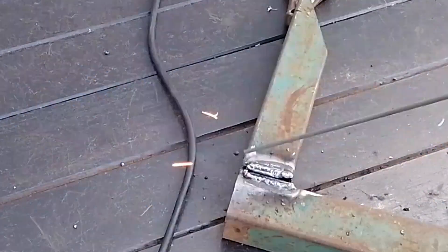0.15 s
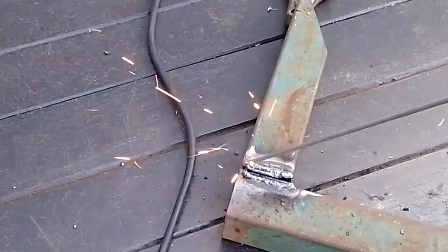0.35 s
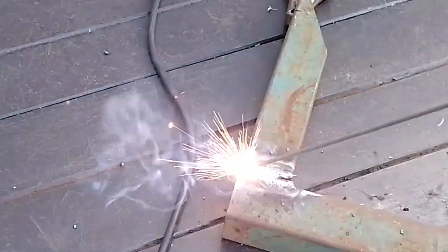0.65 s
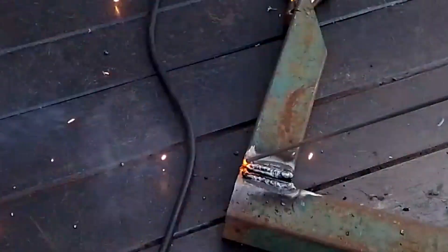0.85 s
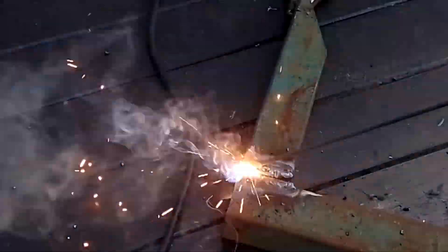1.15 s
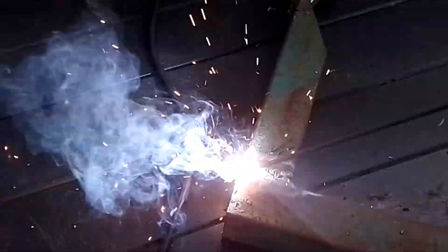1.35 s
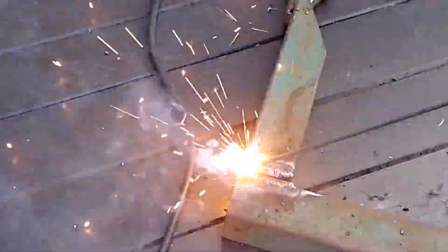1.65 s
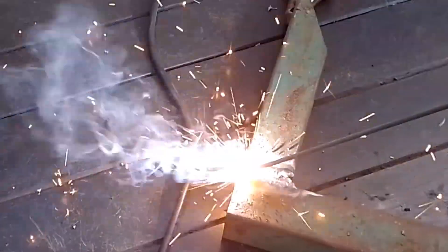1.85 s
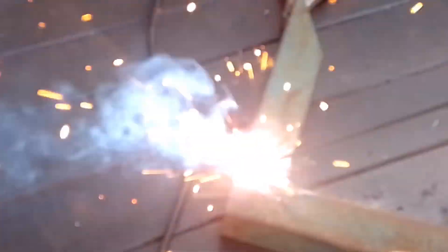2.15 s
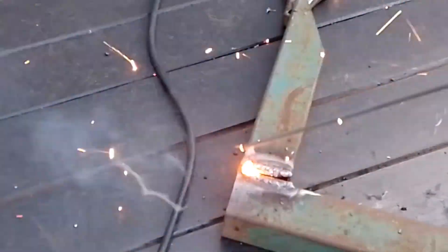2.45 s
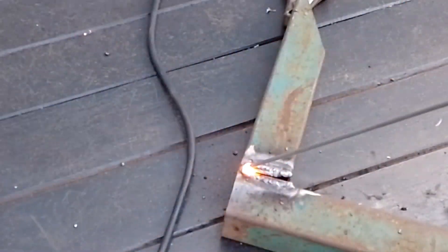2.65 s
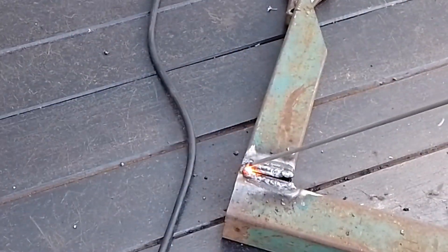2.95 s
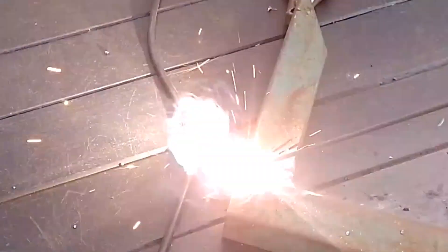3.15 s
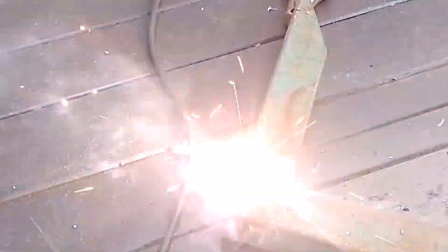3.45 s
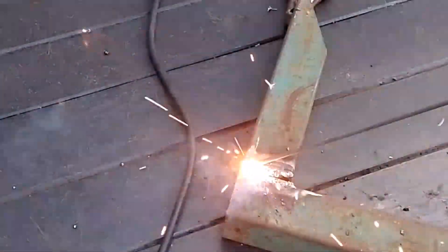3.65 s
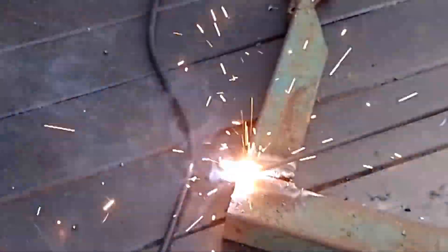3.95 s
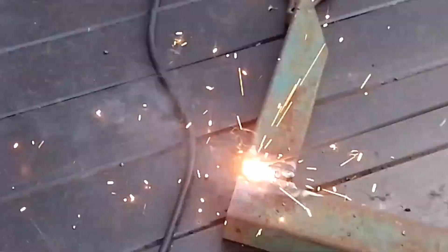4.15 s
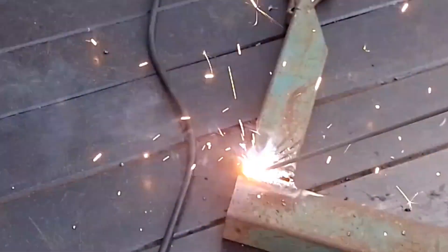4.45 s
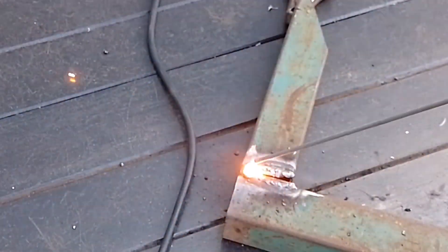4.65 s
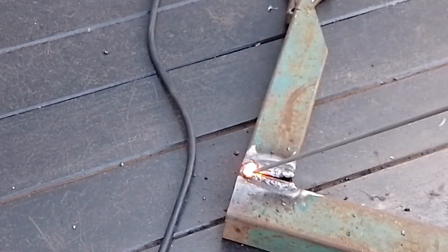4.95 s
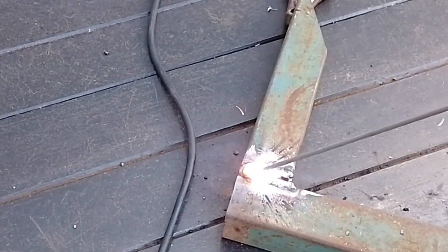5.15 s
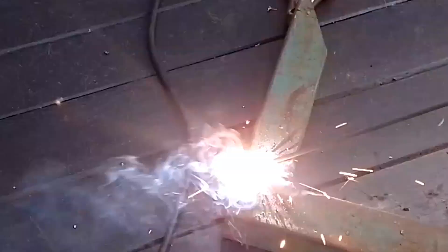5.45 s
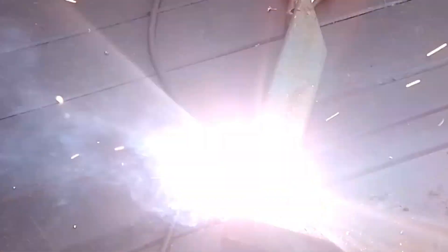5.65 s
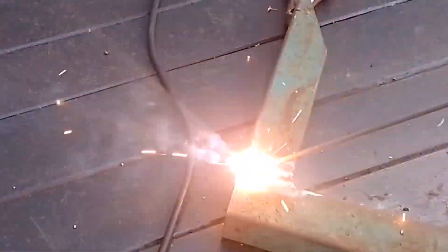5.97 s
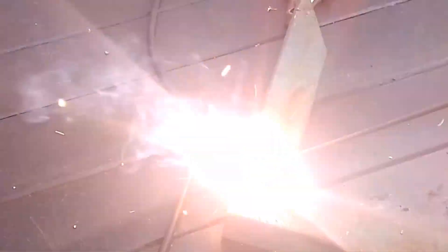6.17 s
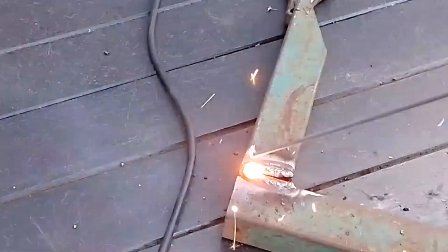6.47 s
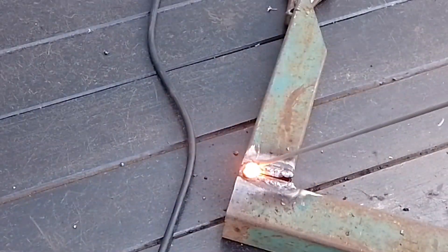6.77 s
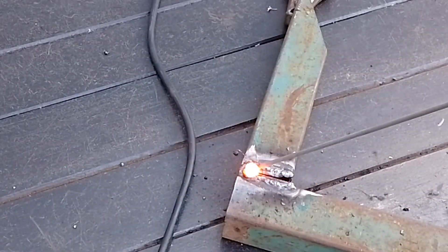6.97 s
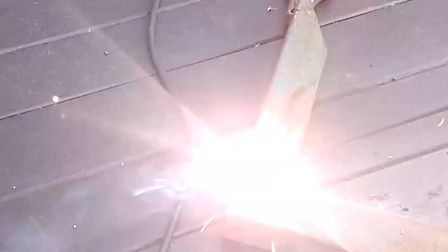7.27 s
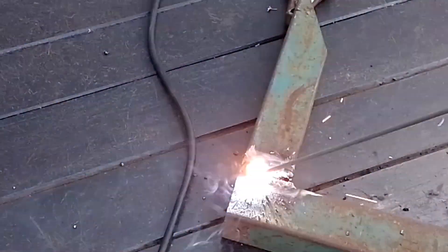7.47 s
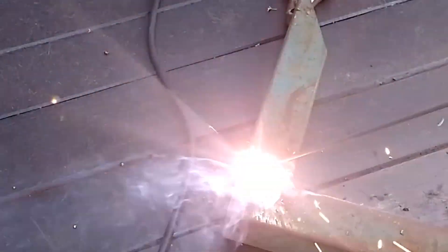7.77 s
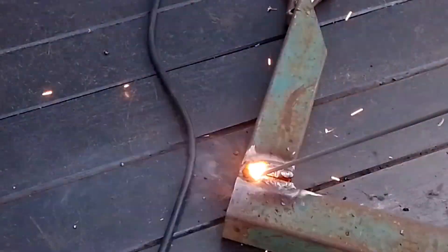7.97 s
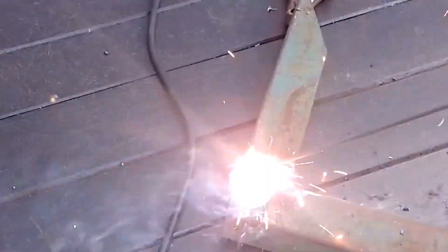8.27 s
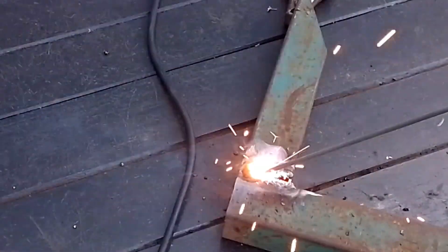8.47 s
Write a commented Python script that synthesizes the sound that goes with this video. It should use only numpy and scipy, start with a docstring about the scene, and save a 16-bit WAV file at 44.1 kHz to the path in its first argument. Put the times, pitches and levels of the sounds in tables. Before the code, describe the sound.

An arc welder sizzles and crackles on a thin steel tube in four short bursts, with sharp pops and soft ticks between.

```python
"""A faint fan hums, then a welding rod scratches a thin steel tube and its arc burns four times.
The arc sizzles and crackles, drops of metal short it with sharp pops, and hot gas gives a low,
fluttering roar. The tube rings, and the steel and a wooden deck below throw each snap back.
Between burns, spatter and cooling slag (the crust on the weld) tick softly."""
import sys
import numpy as np
from scipy import signal
from scipy.fft import rfft, irfft, next_fast_len
from scipy.io import wavfile
from scipy.ndimage import uniform_filter1d, map_coordinates

SR = 44100
rng = np.random.default_rng(int(sys.argv[2]) if len(sys.argv) > 2 else 0)


def generate_wav(sig):
    """Save sig (samples, or channels by samples) to the path in sys.argv[1] as 16-bit PCM at SR."""
    pcm = np.round(np.clip(np.atleast_2d(sig).T, -1, 1) * 32767).astype(np.int16)
    wavfile.write(sys.argv[1], SR, pcm)


N = 379701
TIME = np.arange(N) / SR


def amp(db):
    """Turn decibels into a gain."""
    return 10 ** (np.asarray(db) / 20)


def unit(x):
    """Scale x to an average power of 1."""
    return x / np.sqrt(np.mean(x ** 2) + 1e-20)


def along(points, hz):
    """Read between (frequency, value) points on a log frequency axis."""
    freqs, values = np.transpose(points)
    return np.interp(np.log(hz + 1), np.log(freqs + 1), values)


def curves(rows):
    """Turn each column after the time into one value per sample."""
    times, *columns = np.transpose(rows)
    return [np.interp(TIME, times, column) for column in columns]


def spans(rows, edge_s):
    """Add up flat bumps with sloping edges, one per (start, length, height) row."""
    return sum(np.interp(TIME, [s - edge_s, s, s + length, s + length + edge_s], [0, height, height, 0])
               for s, length, height in rows)


def wobble(rate):
    """A smooth curve through `rate` random values a second."""
    return map_coordinates(rng.standard_normal(int(N * rate / SR) + 4), [TIME * rate])


def filtered(x, response):
    """Scale and shift each frequency of x by response(hz)."""
    size = next_fast_len(len(x) + SR // 10)
    return irfft(rfft(x, size) * response(np.fft.rfftfreq(size, 1 / SR)), size)[:len(x)]


def resonances(modes, hz):
    """The response of something that rings at each (frequency, width, level) row."""
    return sum(amp(db) * 1j * hz * width / (f * f - hz * hz + 1j * hz * width) for f, width, db in modes)


def noise(spectrum):
    """Noise of power 1, shaped by (frequency, level) points."""
    return unit(filtered(rng.standard_normal(N), lambda hz: amp(along(spectrum, hz))))


# the hum of the welder's fan: (frequency [Hz], level [dB])
FAN_TONES = [(392, -75.5), (330, -86)]
# the steady rush of air: (frequency [Hz], relative level [dB])
AIR_SPECTRUM = [(15, -60.5), (25, -37.5), (193, -39), (227, -17), (331, -16.5), (368, -20.5), (399, -4.5),
                (445, -18.5), (782, -14), (919, -22.5), (1410, -23.5), (2420, -30), (7500, -40),
                (8810, -37), (15500, -46.5)]
def fan():
    """The fan hums two slightly unsteady tones over a rush of air."""
    hum = 0
    for hz, db in FAN_TONES:
        level = amp(db + 1.1 * wobble(7))
        phase = 2 * np.pi * np.cumsum(hz + 0.7 * wobble(4)) / SR
        hum += level * np.sqrt(2) * np.sin(phase)
    return hum + amp(-69) * noise(AIR_SPECTRUM)


# a faint distant rumble: (time [s], level [dB])
RUMBLE_LEVELS = [(0, -91), (3.5, -91), (5.3, -91.5), (6.3, -77.5), (7.8, -82.5), (8.6, -91)]
def rumble():
    """Low noise from far away swells slowly."""
    level = amp(curves(RUMBLE_LEVELS)[0])
    return level * noise([(20, -8), (55, -1), (120, -3.5), (170, -22), (600, -76.5)])


# the tone of one electric snap: (frequency [Hz], relative level [dB])
SNAP_SPECTRUM = [(120, -33.5), (700, -28), (1150, -16), (1800, -21.5), (2400, -18), (3400, -11),
                 (4100, -15), (5000, -15.5), (5700, -14), (7000, -5), (7800, -7.5), (9300, -0.5),
                 (10600, -5.5), (12100, -8.5), (13200, -14), (15300, -12.5)]
def snapped(x, body_db, split_hz=4700):
    """Turn each click into a snap. body_db sets how full it sounds: the part below split_hz."""
    size = 1024
    hz = np.fft.rfftfreq(size, 1 / SR)
    gain = amp(along(SNAP_SPECTRUM, hz))
    gain /= np.sqrt(np.mean(gain ** 2 * (hz > split_hz)))
    # minimum phase: a sudden start, then the ring
    fold = np.r_[1, np.full(size // 2 - 1, 2), 1, np.zeros(size // 2 - 1)]
    cepstrum = irfft(np.log(gain)) * fold
    snap = irfft(np.exp(rfft(cepstrum)))

    def band(sound, kind):
        sections = signal.butter(2, split_hz, kind, fs=SR, output="sos")
        return signal.sosfilt(np.tile(sections, (2, 1)), sound)

    clicks = band(x, "high") + band(x * amp(body_db), "low")
    thin = signal.lfilter(*signal.butter(1, 220, "high", fs=SR), clicks)
    return signal.fftconvolve(thin, snap)[:N]


def spits(rate, spread_db):
    """Scattered clicks of uneven size, about `rate` a second."""
    return (rng.random(N) < rate / SR) * amp(spread_db * rng.uniform(-1, 1, N))


def cooling_slag():
    """Slag crackles faintly, in patches, as it shrinks."""
    return snapped(amp(-65 + 4 * wobble(7)) * spits(rate=70, spread_db=8), body_db=-4.5)


def bursts(rows, spray_db, spray_s=0.0027, lead_s=0.0007):
    """Each drop sputters for an instant, goes off in one sharp click and scatters smaller ones."""
    lead = SR // 200
    t = np.arange(-lead, 2 * lead) / SR
    swell = np.exp(np.minimum(t / lead_s, -t / spray_s))
    clicks, body = np.zeros((2, N + len(t)))
    for s, db, body_db in rows:
        spray = swell * rng.standard_normal(len(t)) ** 3
        burst = amp(spray_db) * spray / np.linalg.norm(spray)
        burst[lead] = 1  # the main click
        start = round(s * SR) - lead
        clicks[start:start + len(t)] += amp(db) * burst
        body[start:start + len(t)] = body_db
    return snapped(clicks[:N], body[:N])


# spatter and slag between burns: (time [s], level [dB], body gain [dB])
SPATTER_TICKS = [(.1415, -27.5, 12), (1.93, -51, -9), (2.149, -46.5, 8), (4.068, -49.5, 0),
                 (4.093, -48.5, -1.5), (5.812, -36.5, -10), (5.905, -43.5, -3.5), (6.24, -48, -1.5),
                 (6.363, -56.5, -9), (8.104, -34, 5), (8.49, -45, -2), (8.573, -44.5, -4.5)]
def spatter():
    """Bits of spatter and slag tick while the arc is out."""
    return bursts(SPATTER_TICKS, spray_db=-13, spray_s=0.002, lead_s=0.0004)


# large drops that push the air: (time [s], level [dB])
AIR_PUSHES = [(0.143, -42.5), (0.4413, -23), (0.5908, -26.5), (0.762, -29), (3.368, -20), (4.9002, -26.5),
              (5.1397, -30), (5.6578, -28), (6.5481, -26.5), (6.7004, -34), (7.0355, -30), (7.172, -31),
              (7.5408, -33.5)]
def thumps(push_s=0.00031, knock_hz=430, knock_s=0.003):
    """A bursting drop gives one quick push of air and a short hollow knock from the tube."""
    t = np.arange(SR // 10) / SR
    push = (1 - t / push_s) * np.exp(-t / push_s)
    knock = amp(-27.5) * np.sin(2 * np.pi * knock_hz * t) * np.exp(-t / knock_s)
    thump = signal.lfilter(*signal.butter(4, 1500, fs=SR), push + knock)
    hits = np.zeros(N)
    for s, db in AIR_PUSHES:
        hits[round(s * SR)] = amp(db)
    return signal.fftconvolve(hits, thump)[:N]


def gate(start, end, fall_db_per_s, rise_db_per_s=4199):
    """A gain that snaps on at start, holds, and dies away from end."""
    db = np.minimum((TIME - start) * rise_db_per_s, (end - TIME) * fall_db_per_s)
    return amp(np.clip(db, -140, 0))


# a short scratch, then four burns: (start [s], end [s], body gain [dB], hiss afterwards [dB])
ARC_BURNS = [(0.145, 0.178, 13.5, -57.5), (0.304, 1.736, 4, -47.5), (2.368, 3.865, 2.5, -59),
             (4.447, 5.727, 3, -54), (6.381, 7.966, 3, -61)]
def burning(fall_db_per_s):
    """0 dB while the arc is lit, falling each time it goes out."""
    return 20 * np.log10(sum(gate(start, end, fall_db_per_s) for start, end, _, _ in ARC_BURNS))


# the arc's slow drift: (time [s], sizzle level [dB], gas roar level [dB])
ARC_DRIFT = [(0.155, -44, -47.5), (0.33, -34.5, -53.5), (0.44, -35.5, -41.5), (0.53, -38.5, -53.5),
             (0.62, -30, -43.5), (0.8, -30, -42), (0.98, -33.5, -53.5), (1.25, -31.0, -48),
             (1.45, -36, -46.5), (1.64, -37, -58), (1.73, -35, -44), (2.38, -38, -56), (2.48, -36, -56.5),
             (2.6, -33, -52.5), (2.78, -37.5, -62.5), (3.03, -35, -60), (3.25, -36, -56.5),
             (3.59, -34, -53), (3.68, -34.5, -62.5), (3.85, -34.5, -57), (4.46, -43.5, -76),
             (4.56, -34, -58), (4.72, -34, -54.5), (5.0, -34.5, -56), (5.28, -37.5, -59),
             (5.42, -36, -50.5), (5.6, -34, -50), (5.71, -37.0, -49), (6.4, -40.5, -61),
             (6.52, -36.5, -64.5), (6.82, -34.5, -57), (7.13, -36, -61), (7.3, -32.5, -58.5),
             (7.62, -33.5, -72.5), (7.74, -33, -70.0), (7.85, -39, -68), (7.95, -34.5, -62.5)]
# the arc flares and its crackle swells: (start [s], length [s], boost [dB])
ARC_FLARES = [(0.314, 0.047, 5.5), (0.44, 0.049, 4), (0.655, 0.023, 6.5), (0.76, 0.08, 5),
              (1.275, 0.022, 4), (1.52, 0.014, 2), (1.708, 0.033, 8), (2.57, 0.0072, 9), (2.613, 0.034, 6),
              (2.798, 0.052, 7), (3.005, 0.03, 4), (3.06, 0.095, 5.5), (3.26, 0.034, 5),
              (3.395, 0.024, 5.5), (3.735, 0.08, 2.5), (4.476, 0.023, 10.5), (4.692, 0.022, 2.5),
              (4.795, 0.048, 4), (5.128, 0.06, 7.5), (5.69, 0.03, 5), (6.495, 0.015, 9), (6.7, 0.014, 1.5),
              (7.03, 0.048, 7), (7.282, 0.022, 3.5), (7.425, 0.009, 1), (7.49, 0.015, -2),
              (7.705, 0.041, 5), (7.915, 0.015, 4.5)]
# the rod sticks and chokes the arc: (start [s], length [s], dip [dB])
ROD_STALLS = [(0.493, 0.016, 26), (2.402, 0.035, 40), (2.702, 0.023, 27), (2.757, 0.013, 20),
              (2.944, 0.0066, 10), (7.34, 0.012, 18), (7.868, 0.017, 4.5)]
def arc_levels():
    """Sizzle, body and roar in dB as the arc drifts, flares, stalls and sinks into its crater."""
    sizzle_drift, roar_drift = curves(ARC_DRIFT)
    flare_db = spans(ARC_FLARES, edge_s=0.006)
    stall_db = spans(ROD_STALLS, edge_s=0.0027)
    sizzle_db = 0.32 + sizzle_drift + burning(fall_db_per_s=657) + flare_db - stall_db
    roar_db = 0.2 + roar_drift + burning(fall_db_per_s=381) - 0.71 * stall_db
    body_db, = curves([(s, body) for start, end, body, _ in ARC_BURNS for s in (start, end)])
    body_db -= 0.52 * flare_db  # a flare lifts the body less than the treble
    body_db -= 18 * (curves(ROD_DEPTH)[0] - ROD_DEPTH[0][1])  # the sound thins as the rod sinks
    return sizzle_db, body_db, roar_db


def crackle(rate, spread_db, clump_db):
    """Tiny sparks of uneven size come in clumps, at a steady average power."""
    fires = rng.random(N) < rate / SR
    size_db = spread_db * np.clip(rng.standard_normal(N), -3, 2.2)
    sparks = fires * amp(size_db + clump_db * wobble(130))
    power = np.abs(uniform_filter1d(sparks ** 2, size=2200))
    return sparks / np.sqrt(power + 1e-9)


def hiss():
    """Gas hisses with a quick flicker."""
    return unit(rng.standard_normal(N) * amp(2.5 * wobble(160)))


def arc(sizzle_db, body_db):
    """A hot arc crackles and spits; as it dies only a hiss of gas is left."""
    heat = np.clip((sizzle_db + 56) / 10, 0, 1)
    spark_share = 0.73 * heat
    fizz = np.sqrt(1 - spark_share) * hiss()
    fizz += np.sqrt(spark_share) * crackle(rate=1500, spread_db=2, clump_db=3.5)
    fizz += amp(20.5) * heat * spits(rate=45, spread_db=4)
    # the body flickers at random under the treble
    return snapped(amp(sizzle_db) * fizz, body_db + 1.3 * wobble(200))


# the tone of the hot gas: (frequency [Hz], relative level [dB])
GAS_SPECTRUM = [(30, -41.5), (200, -34.5), (300, -11), (410, 0), (540, -5), (730, -17.5), (860, -8),
                (1100, -27), (3000, -74.5)]
def gas_roar(roar_db):
    """Gas from the rod's coating flutters as it expands; a strong jet also sounds deeper."""
    jet = np.clip((roar_db + 60.5) / 12, 0, 1)
    deep = noise([(190, -47), (240, -4), (310, -2), (420, -12), (900, -71)])
    gas = noise(GAS_SPECTRUM) + amp(-12) * jet * deep
    flutter = unit(amp(3.1 * wobble(70)))
    return amp(roar_db) * gas * flutter


def after_hiss(hold_s=0.075):
    """The hot rod goes on hissing thinly just after the arc goes out."""
    level = sum(amp(db) * gate(end, end + hold_s, fall_db_per_s=600) for _, end, _, db in ARC_BURNS)
    return snapped(level * hiss(), body_db=-15)


# large drops of melted metal: (time [s], relative level [dB], body gain [dB])
DROP_POPS = [(0.3006, -3.5, -9), (0.3214, 2.0, 0.5), (0.3935, -1.5, 2), (0.4386, 2.5, 5.5),
             (0.4556, 1.0, -5), (0.5098, 5.5, -3.5), (0.5307, -0.5, -7), (0.5801, 2, -3),
             (0.5913, -0.5, -4), (0.6766, -2, -2), (0.7272, -2, -20), (0.7633, 0, 2.5), (0.7898, -8, -11),
             (0.8332, -0.5, -9), (0.8774, -3, -15), (1.2838, -5, -17), (1.5288, -6.5, 6.5),
             (1.6797, -1.5, -3), (1.7117, -4, 2), (2.3674, -12.5, 4), (2.4324, 1.5, -7.5), (2.5701, -7, -3),
             (2.6924, -5, -8.5), (2.9161, -3, -6), (2.9672, -1.5, -21), (3.0252, -4.5, -6.5),
             (3.1111, -1.5, -5.5), (3.1446, -1.5, -7), (3.285, -6, -4), (3.3192, -1.5, -14),
             (3.3433, -3.5, 0), (3.3675, 3.5, -9), (3.4141, -5, -6), (3.4304, -2, -4), (3.5039, 0.0, -5),
             (3.5533, -1.5, -12.5), (3.5737, -3.5, 1), (3.6176, -3.5, 2.5), (3.8162, -7, -6),
             (4.4802, -1.5, -12), (4.4907, -2, 0), (4.528, -2, -15), (4.5686, -7, 7), (4.6358, 0.0, -2.5),
             (4.6973, -5.5, 10.5), (4.8019, -6, -2), (4.9012, -1, 5.5), (4.9474, -2.5, -13.5),
             (4.989, 1.5, -8.5), (5.1398, 4.5, -4.5), (5.1803, -0.5, -14), (5.2014, -5, 4.5),
             (5.2685, -10, 2), (5.4119, -5.5, -3), (5.4485, -4.5, -11), (5.6064, -10, 2), (5.6591, 3, -5.5),
             (5.7061, -8.5, 5.5), (5.7228, -6.5, -6), (6.3869, -3.5, -1.5), (6.4466, -5.0, -3),
             (6.503, -3.5, -0.5), (6.5472, 0.5, 3), (6.6137, -3, -2), (6.6627, -1.5, -2),
             (6.6994, -1.5, 8.5), (6.712, 2, -1), (6.752, -1, -11), (6.937, -13.5, 12), (7.0366, 0, -5.5),
             (7.1725, 4, -17), (7.2898, -5.5, -6), (7.3049, -1.5, -8), (7.5018, -1.5, -5), (7.5412, 0, -15),
             (7.7092, -5, 1), (7.8222, -2, -7.5), (7.9174, 1.5, -19), (7.9636, 0, -20.5)]
def large_drops():
    """A large drop shorts the arc and bursts with a sharp pop."""
    return amp(2) * bursts(DROP_POPS, spray_db=-3)


def small_drops(sizzle_db, rate=15, above_sizzle_db=26.5):
    """Small drops burst at random; their level follows the sizzle."""
    count = int(rate * N / SR)
    times = rng.uniform(ARC_BURNS[0][0], ARC_BURNS[-1][1], count)
    level_db = sizzle_db[(times * SR).astype(int)] + above_sizzle_db
    body_db = rng.uniform(-9, 3, count)
    return bursts(zip(times, level_db, body_db), spray_db=-1.5)


# how deep the rod sits in its crater: (time [s], depth [0-1])
ROD_DEPTH = [(7.55, 0.32), (7.7, 0.66), (7.95, 0.73)]
# where the crater rings: (frequency [Hz], width [Hz], level [dB])
CRATER_MODES = [(2620, 680, -7.5), (3220, 590, -2.5), (5510, 290, 1.5), (6044, 140, 4), (7166, 420, 2.5),
                (8430, 550, -3), (9480, 680, 3), (11880, 1800, -6.5), (14700, 220, -4)]
def crater(x):
    """Deep in its crater the arc turns hollow and whistles."""
    depth, = curves(ROD_DEPTH)
    return (1 - depth) * x + depth * filtered(x, lambda hz: resonances(CRATER_MODES, hz))


# two echoes off the steel for each rod position:
# (start [s], first delay [ms], first gain [ratio], second delay [ms], second gain [ratio])
STEEL_ECHOES = [(0, 0.344, 0.13, 0.7, 0.042), (2.2, 0.34, 0.14, 0.32, 0.078),
                (4.3, 0.33, 0.23, 0.38, 0.064), (6.2, 0.328, 0.21, 0.36, 0.048),
                (7.65, 0.33, 0.35, 0.61, 0.14)]
def steel_echoes(x, sway=0.016):
    """Quick echoes off the steel colour the sound; they shift as the hand sways the rod."""
    rows = np.array(STEEL_ECHOES)
    held = rows[np.searchsorted(rows[1:, 0], TIME)]
    out, power = x, 1
    for ms, gain in (held[:, 1:3].T, held[:, 3:5].T):
        lag = ms * SR / 1000 * (1 + sway * wobble(5.3))
        out = out + gain * map_coordinates(x, [np.arange(N) - lag], order=5)
        power = power + gain ** 2
    return out / np.sqrt(power)


# where the steel tube rings: (frequency [Hz], width [Hz], level [dB])
TUBE_MODES = [(903, 16, -12.5), (1384, 190, -3.5), (1564, 88, -0.5), (1930, 120, -4.5), (2320, 80, 4),
              (2745, 110, -6.5), (4160, 57, -4), (4630, 130, -4), (6650, 270, -7.5)]
def tube(x):
    """Each snap sets the tube ringing."""
    return filtered(x, lambda hz: 1 + resonances(TUBE_MODES, hz))


# echoes off the frame, the deck and things nearby: (delay [ms], gain [ratio])
DECK_ECHOES = [(.901, 0.11), (1.46, 0.032), (2.1, 0.053), (2.437, 0.11), (2.935, 0.12), (7.45, 0.066),
               (14, 0.017), (17.9, 0.072), (19.4, 0.13)]
def deck_echoes(x):
    """Nearby surfaces throw the sound back; the overall power stays about the same."""
    def response(hz):
        return 1 + sum(gain * np.exp(-2j * np.pi * hz * ms / 1000) for ms, gain in DECK_ECHOES)

    power = 1 + sum(gain ** 2 for _, gain in DECK_ECHOES)
    return filtered(x, response) / np.sqrt(power)


# the echo of the walls: (frequency [Hz], time to fade by 60 dB [s])
WALL_DECAY = [(300, 0.16), (3000, 0.3), (9000, 0.12), (15000, 0.21)]
def walls(x, build_s=0.0091):
    """The walls answer with a short, blurred echo that lasts longest near 3 kHz."""
    hz, t, spectrum = signal.stft(rng.standard_normal(SR // 2), SR, nperseg=256)
    fade = amp(-60 * t / along(WALL_DECAY, hz)[:, None])
    tail = signal.istft(spectrum * fade, SR, nperseg=256)[1]
    tail *= 1 - np.exp(-(np.arange(len(tail)) / SR / build_s) ** 2)
    return signal.fftconvolve(x, tail / np.linalg.norm(tail))[:N]


def scene():
    """The arc and its pops in their surroundings, over the fan and the rumble."""
    sizzle_db, body_db, roar_db = arc_levels()
    pops = large_drops() + small_drops(sizzle_db)
    ticks = spatter() + cooling_slag()
    snaps = crater(arc(sizzle_db, body_db) + after_hiss() + pops) + ticks
    weld = tube(steel_echoes(snaps)) + gas_roar(roar_db) + thumps()
    return (deck_echoes(weld) + amp(-21.5) * walls(weld) + fan() + rumble())[None]


def record(dry, ceiling=0.66, top_hz=15520):
    """The microphone's opening rings and smears each snap; loud pops squash; the top treble is cut."""
    smeared = filtered(dry[0], lambda hz: 1 - 2 * resonances([(10500, 4500, 0)], hz))
    squashed = smeared / (1 + np.abs(smeared / ceiling) ** 6) ** (1 / 6)
    return filtered(squashed, lambda hz: 1 / np.sqrt(1 + (hz / top_hz) ** 300))[None]


dry = scene()
out = record(dry)
generate_wav(out)
```